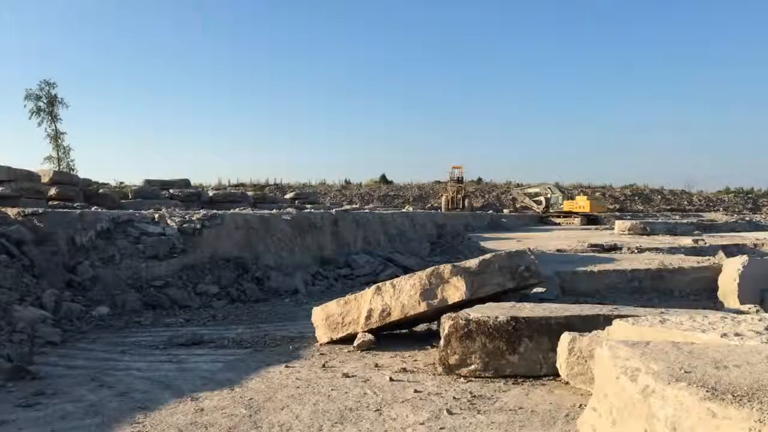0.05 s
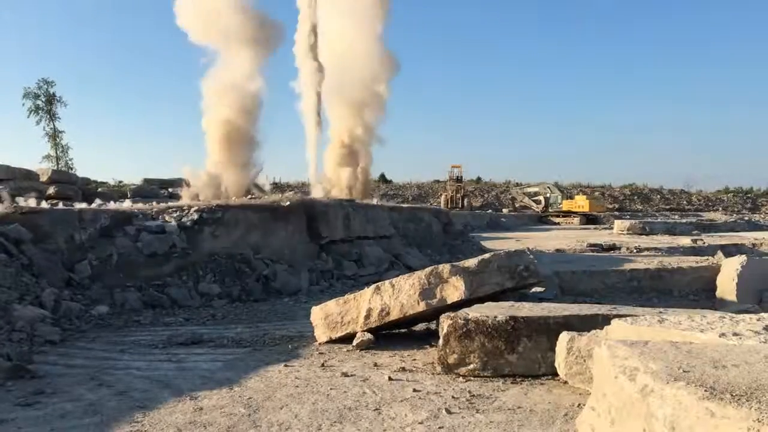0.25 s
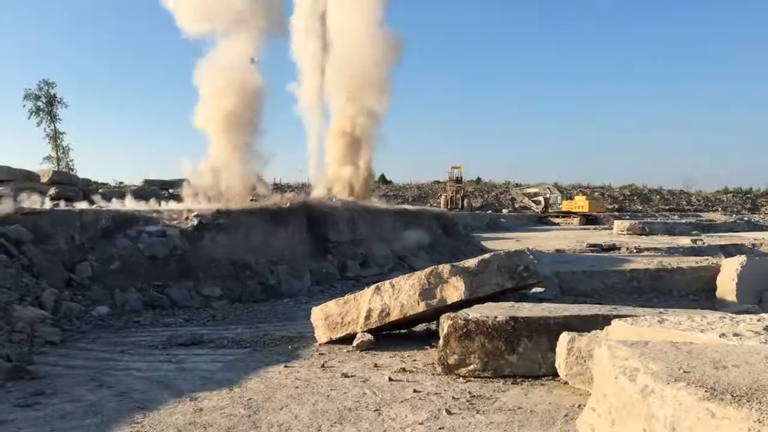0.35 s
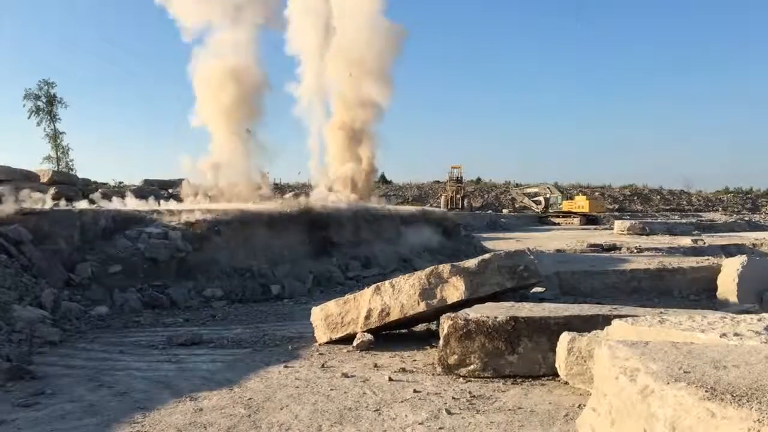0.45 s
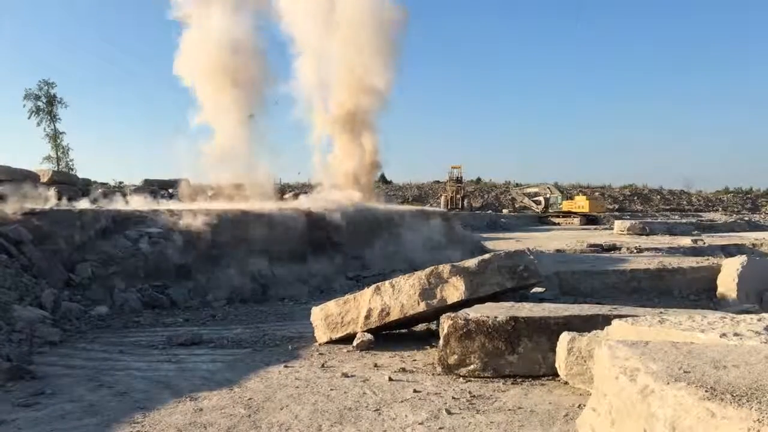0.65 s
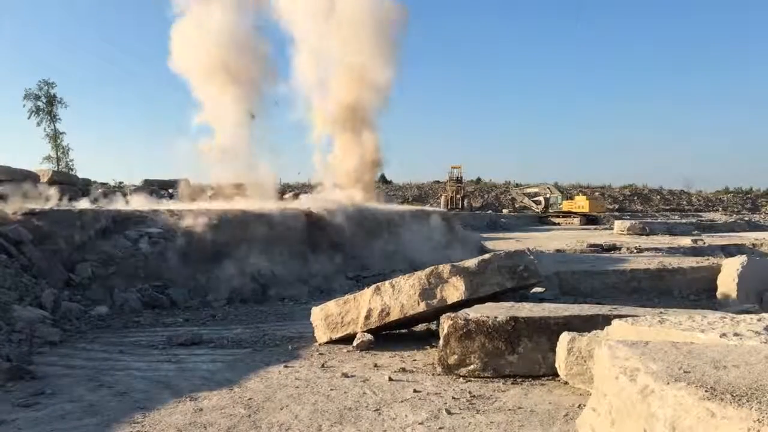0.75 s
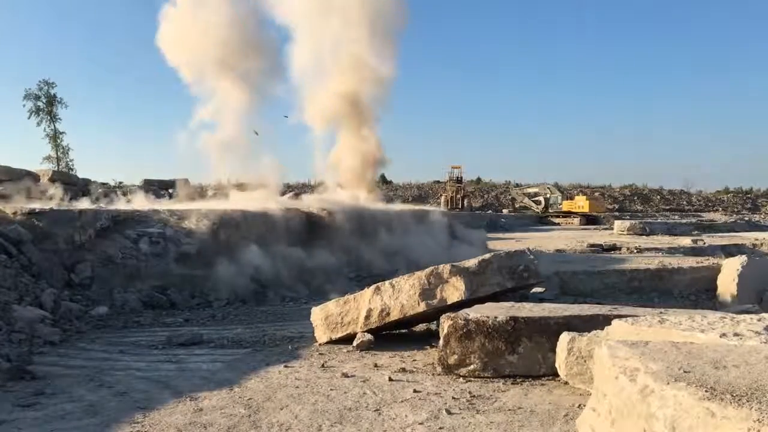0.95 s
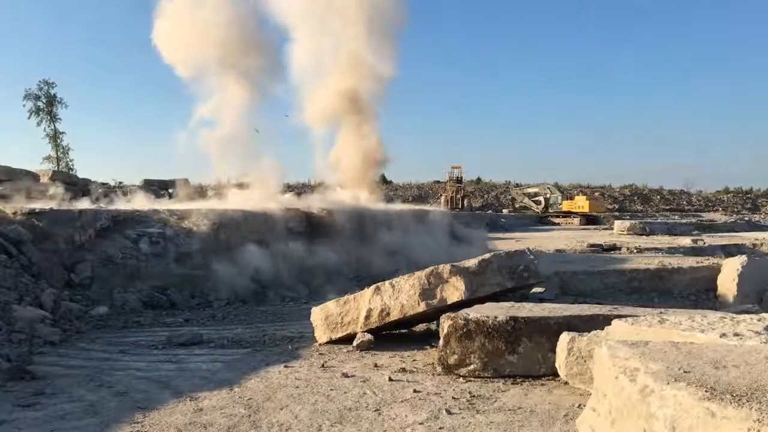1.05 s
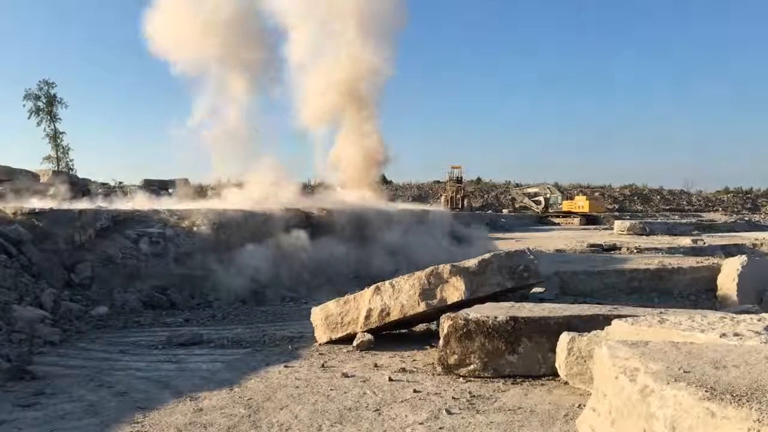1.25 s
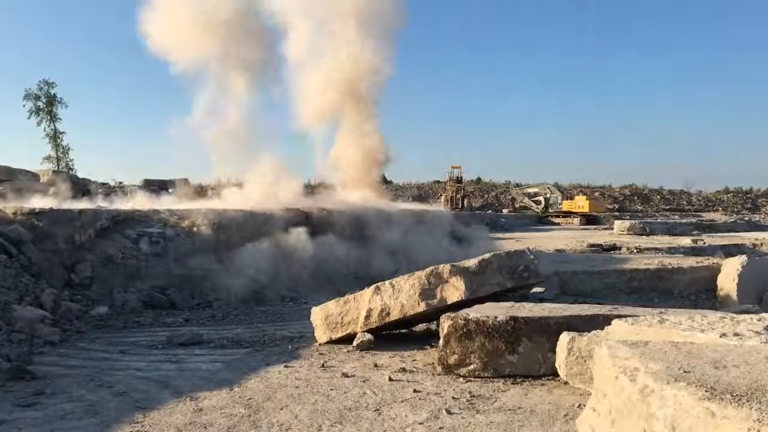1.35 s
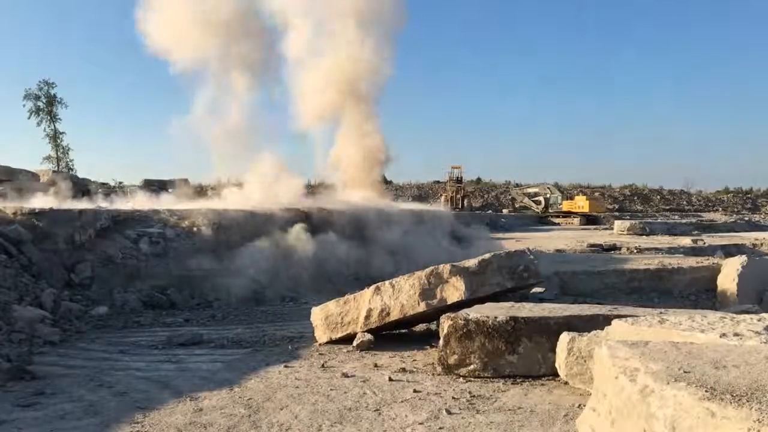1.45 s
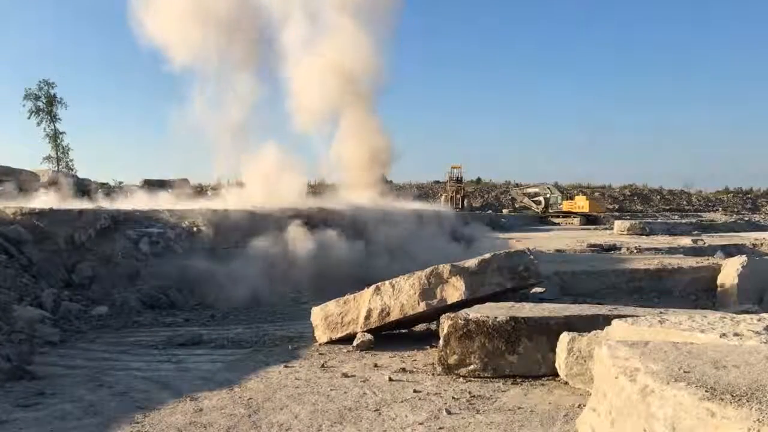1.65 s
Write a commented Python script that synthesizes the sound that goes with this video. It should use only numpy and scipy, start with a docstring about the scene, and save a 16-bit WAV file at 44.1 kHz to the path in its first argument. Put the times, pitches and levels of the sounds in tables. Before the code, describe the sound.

Explosion in a quarry: deep thump, tearing crack, rock-face slaps, then raining debris and a thud

```python
"""Quarry blast

Rock charges go off across a quarry, heard on a small camera. The ground shock comes first, as low swings that die
away; then the air blast, as shaped noise with short cracks and two slaps from the rock faces. Grit (noise and tiny
tones) and stones (short noise hits) rain down over a low rumble and far noise, and a big block lands with a thud.
The microphone rings near 3.4 kHz and flattens the loudest swings."""
import sys
import numpy as np
from scipy.fft import rfft, irfft, next_fast_len
from scipy.io import wavfile
from scipy.ndimage import map_coordinates

SR = 44100
rng = np.random.default_rng(int(sys.argv[2]) if len(sys.argv) > 2 else 0)


def waveform_to_disk(signal):
    """Save audio, clipped to [-1, 1], as 16-bit WAV at the path in sys.argv[1]."""
    frames = np.transpose(np.atleast_2d(signal))
    scaled = np.clip(frames, -1, 1) * 32767
    samples = np.round(scaled).astype(np.int16)
    wavfile.write(sys.argv[1], SR, samples)


N = 74970  # length in samples, 1.7 s

# Loudness of the low rumble. Each row: time in seconds, level in dB.
RUMBLE_LEVEL = [(0, -23.5), (.2, -32), (.34, -23), (.4, -29.5), (.47, -36), (.52, -27), (.6, -26),
                (.668, -22.5), (.69, -39.5), (.76, -31), (.85, -33), (.98, -32), (1.17, -23), (1.2, -50),
                (1.3, -26.5), (1.4, -33.5), (1.46, -24), (1.57, -25), (1.63, -25), (1.66, -30.5),
                (1.7, -17)]
# Colour of the rumble. Each row: frequency in Hz, strength in dB.
RUMBLE_COLOUR = [(20, -32), (40, -6), (62, -6), (90, -0.5), (125, -9), (160, -8.5), (200, -15.5),
                 (260, -17), (320, -29.5), (900, -43), (3000, -120)]

# Colour of the steady far noise. Each row: frequency in Hz, strength in dB.
FAR_NOISE_COLOUR = [(150, -22), (300, 0.5), (600, -9.5), (1500, -9.5), (3500, -12), (5000, -18.5),
                    (7000, -30.5), (9000, -53), (15500, -53)]
FAR_NOISE_DB = -51

# Low swings of ground and air. Each row: start in seconds, level in dB, pitch in Hz, time constant of the rise
# in seconds, basic time to fall by 60 dB in seconds (each tone of the swing takes its own share of it).
LOW_SWINGS = [(0.2371, -1.5, 153.2, 0.0066, 0.14), (0.246, -2.5, 99.4, 0.001, 0.093),
              (0.2534, 4.5, 76.6, 0.0018, 0.14), (.279, -2.5, 163.5, 0.0085, 0.19),
              (0.303, 2.5, 57.4, 0.0043, 0.126), (0.381, -0.5, 88, 0.005, 0.047),
              (0.586, -23, 103.7, 0.0038, 0.59), (0.641, -26.5, 100, 0.0059, 0.14),
              (1.211, -14.5, 83.06, 0.0033, 0.5), (1.23, -9, 133.5, 0.0028, 0.049),
              (1.241, -2, 108.2, 0.0026, 0.096), (1.477, -5, 119, .003, 0.03),
              (1.523, -18, 76, 0.0044, 0.21), (1.616, -23, 137.7, 0.0054, 0.2),
              (1.692, -19, 84, 0.0032, 0.17)]
# Overtones of every low swing. Each row: pitch as a multiple of the swing's, level in dB beside it,
# share of the swing's basic fall time.
SWING_OVERTONES = [(2.3, -6.5, 0.39), (3.7, -10, 0.23)]

# Loudness of the air blast. Each row: time in seconds, level of the dull roar in dB,
# level of the bright tearing in dB.
BLAST_LEVELS = [(0.229, -49.5, -66), (0.238, -31, -82), (0.254, -36.5, -74), (0.261, -7.5, -31.5),
                (0.289, -15, -31.5), (.296, -10, -22), (.3, -10.5, -28.5), (0.322, -22.5, -25),
                (0.346, -23.5, -32), (0.356, -21, -27), (0.377, -23.5, -31.5), (.39, -34, -40),
                (0.418, -29.5, -39), (.455, -45.5, -51), (.5, -93, -50)]
# Colours of the dull roar and the bright tearing. Each row: frequency in Hz, strength in dB.
ROAR_COLOUR = [(60, -28.5), (200, 5), (450, -8.5), (1100, -8.5), (2000, -20), (4000, -36), (8000, -82),
               (16000, -120)]
TEAR_COLOUR = [(500, -6), (1500, -11), (3000, -1.5), (6000, -7.5), (10000, -17), (15500, -32)]
# Cracks of the charges and slaps from the rock faces. Each row: start in seconds, level in dB, centre in Hz,
# width of the resonance as a share of its centre, time for the crunch to fall by 60 dB in seconds.
CRACK_HITS = [(.2595, -20, 586, 0.5, 0.01), (.272, -16, 2600, 0.83, 0.041), (.278, -11, 1075, 0.46, 0.019),
              (.2855, -11, 1510, 1.5, 0.044), (.2905, -10.5, 1890, 1.94, 0.065),
              (.351, -16, 3400, 1.64, .025), (.3515, -17.5, 906, 0.3, 0.033),
              (.3535, -19, 1520, 0.48, 0.018), (.4165, -30, 3500, 0.98, 0.024)]

# Loudness of the falling debris. Each row: time in seconds, level of the gravel rush in dB,
# level of the fine patter in dB.
GRIT_LEVELS = [(.44, -74, -78), (.478, -46, -47), (.506, -33.5, -37.5), (.535, -36.5, -43),
               (.57, -34.5, -39.5), (.61, -40.5, -45), (.66, -35, -38.5), (.76, -42.5, -43.5),
               (.85, -37, -43.5), (.98, -35.5, -39.5), (1.06, -36.5, -43), (1.09, -36, -44.5),
               (1.17, -36.5, -41), (1.215, -38.5, -51), (1.25, -39, -57), (1.29, -40.5, -48),
               (1.36, -40, -56), (1.41, -39, -46), (1.45, -38.5, -58), (1.53, -37.5, -43.5),
               (1.58, -44, -60), (1.66, -38.5, -56), (1.7, -36.5, -46)]
# Colour of the gravel rush. Each row: frequency in Hz, strength in dB.
GRAVEL_COLOUR = [(100, -20), (220, 2.5), (400, -1), (700, -6.5), (1200, -6.5), (2500, -11.5), (4000, -15.5),
                 (4700, -19), (6500, -23), (8000, -30), (11000, -33.5), (15500, -43.5)]
GRAINS_PER_S = 800
GRAIN_HZ, GRAIN_SPREAD = 3403, 0.27  # middle pitch in Hz, spread of the natural log of pitch
GRAIN_SIZE_DB = 2.5  # average random boost of a grain
GRAIN_CYCLES = 4  # cycles in which a grain decays to 1/e

# Stones landing. Each row: start in seconds, level in dB, centre in Hz, width of the resonance as a share
# of its centre, time for the crunch to fall by 60 dB in seconds.
STONE_HITS = [(.509, -31.5, 1600, 1.6, 0.14), (.556, -31.5, 2680, 0.77, 0.057),
              (.6715, -34, 1510, 0.1, 0.02), (.898, -35.5, 4280, 0.68, 0.025),
              (.985, -39.5, 6500, 0.52, 0.015), (.994, -31, 2670, 0.43, .03),
              (1.015, -34.5, 3100, 0.27, 0.049), (1.0345, -33, 3700, 0.37, 0.023),
              (1.085, -34, 3270, 0.62, 0.073), (1.086, -43.5, 5560, 0.075, .08),
              (1.135, -33.5, 2900, 1, 0.027), (1.1457, -26, 2500, 0.74, 0.055),
              (1.18, -38, 4170, 0.73, 0.082), (1.192, -37, 3250, 0.12, .04),
              (1.203, -38, 3250, 0.13, 0.013), (1.202, -44, 5520, 0.085, 0.083),
              (1.228, -50, 445, 0.82, .09), (1.2715, -30.5, 3350, 0.77, 0.031),
              (1.283, -34.5, 1180, 0.81, 0.036), (1.3134, -31, 740, 1.6, 0.03),
              (1.3318, -38.5, 990, 0.26, 0.022), (1.3937, -37.5, 1950, 0.57, 0.011),
              (1.4575, -31.5, 3220, 0.76, 0.012), (1.458, -29, 1320, 0.82, 0.029),
              (1.5074, -32.5, 3130, 0.33, 0.01), (1.5304, -35, 4800, 0.85, 0.027),
              (1.539, -31, 639, 0.36, 0.085), (1.5992, -37, 3600, 0.73, 0.024),
              (1.63, -41, 6500, 0.82, 0.039), (1.672, -34.5, 2500, 0.52, 0.027),
              (1.6785, -23.5, 2580, 0.53, 0.043), (1.685, -32, 2430, 0.43, 0.02)]
KICK = 1.7  # strength of the opening click of cracks and stones, before scaling by the width

# Resonances of the microphone. Each row: centre in Hz, width in Hz, lift in dB.
MIC_RESONANCES = [(3250, 150, 4), (3470, 150, 8), (5630, 300, 5)]
BASS_CUT_HZ, TREBLE_ROLL_HZ, TOP_HZ = 30.3, 9260, 15750
CEILING, KNEE = 1.0, 5.4  # largest swing, sharpness of the bend towards it


def amp(db):
    """Turn dB into a plain gain."""
    return 10 ** (np.asarray(db) / 20)


def unit(x):
    """Scale a sound to an average strength (rms) of 1."""
    return x / np.sqrt(np.mean(x ** 2) + 1e-20)


def level(times, db):
    """Gain for every sample, drawn in straight dB lines between the given times in seconds."""
    return amp(np.interp(np.arange(N) / SR, times, db))


def wobble(rate):
    """A smooth random curve through `rate` random points a second."""
    points = rng.standard_normal(int(N * rate / SR) + 4)
    return map_coordinates(points, [np.arange(N) * rate / SR])


def filtered(x, response):
    """Multiply each frequency in x by response(Hz), with spare silence so the ringing does not wrap round."""
    m = next_fast_len(len(x) + 8192)
    return irfft(rfft(x, m) * response(np.fft.rfftfreq(m, 1 / SR)), m)[:len(x)]


def rush(colour):
    """Noise of rms 1, its strength over frequency drawn through the colour's points."""
    points_hz, db = np.transpose(colour)

    def response(hz):
        return amp(np.interp(np.log(hz + 1), np.log(points_hz), db))

    return unit(filtered(rng.standard_normal(N), response))


def peak(hz, centre_hz, width_hz):
    """A resonance with gain 1 at its centre, which rings only after it is struck."""
    return 1j * hz * width_hz / (centre_hz ** 2 - hz ** 2 + 1j * hz * width_hz)


def add(out, start_s, sound):
    """Mix a sound into out from start_s, cutting what runs past the end."""
    start = round(start_s * SR)
    out[start:start + len(sound)] += sound[:N - start]


def bursts(rows):
    """Short hits: a kick and dying crunch, coloured by a resonance that rings when it is narrow."""
    out = np.zeros(N)
    t = np.arange(SR // 5) / SR
    for start_s, db, centre_hz, width, t60 in rows:
        width_hz = abs(width) * centre_hz

        def colour(hz):
            return peak(hz, centre_hz, width_hz) ** 2

        noise = rng.standard_normal(len(t))
        crunch = noise * amp(-60 * t / t60)
        # a one-sample click, made stronger for a narrow resonance
        kick = KICK * np.sqrt(SR / width_hz) * (t == 0)
        hit = filtered(crunch + kick, colour) / np.std(filtered(noise, colour))
        add(out, start_s, amp(db) * hit)
    return out


def rumble():
    """Shifting rock and distant machines make a low noise whose loudness is lumpy."""
    noise = rush(RUMBLE_COLOUR)
    lumpy = amp(1.16 * wobble(30.28))
    return level(*np.transpose(RUMBLE_LEVEL)) * unit(noise * lumpy)


def far_noise():
    """The far noise of the quarry is a steady, coloured hiss."""
    return amp(FAR_NOISE_DB) * rush(FAR_NOISE_COLOUR)


def thumps():
    """Each push sets off a low swing with quicker-dying overtones."""
    out = np.zeros(N)
    t = np.arange(SR // 2) / SR
    tones = [(1, 0, 0.93), *SWING_OVERTONES]  # the main tone comes first
    for start_s, db, pitch_hz, rise_s, t60 in LOW_SWINGS:
        swing = np.zeros(len(t))
        for ratio, tone_db, share in tones:
            fade = amp(tone_db - 60 * t / (t60 * share))
            swing += fade * np.sin(2 * np.pi * pitch_hz * ratio * t)
        rise = 1 - np.exp(-t / abs(rise_s))
        add(out, start_s, amp(db) * rise * swing)
    return out


def blast():
    """The ragged roar of the gases turns brighter as the shock arrives; the cracks sit on top."""
    times, dull_db, bright_db = np.transpose(BLAST_LEVELS)
    ragged = amp(2.0 * wobble(199.7))  # shared by roar and tearing
    roar = level(times, dull_db) * unit(rush(ROAR_COLOUR) * ragged)
    tearing = level(times, bright_db) * unit(rush(TEAR_COLOUR) * ragged)
    return roar + tearing + bursts(CRACK_HITS)


def patter():
    """Many small grains of random time, size and pitch each ring for a few cycles; rms 1 in all."""
    draw = rng.random((int(GRAINS_PER_S * N / SR), 2))
    place, chance = draw[:, :1], draw[:, 1:]
    hz = GRAIN_HZ * np.exp(GRAIN_SPREAD * rng.standard_normal((len(draw), 1)))
    hz = np.clip(hz, 300, 9000)
    t = np.arange(400) / SR
    size = amp(-GRAIN_SIZE_DB * np.log(chance + 1e-9))  # a few grains are far louder than most
    envelope = np.exp(-t * hz / GRAIN_CYCLES) * (1 - np.exp(-t * hz))
    grains = size * envelope * np.sin(2 * np.pi * hz * t)
    # add up all grains at the samples where they fall
    at = (place * N).astype(int) + np.arange(len(t))
    return unit(np.bincount(at.ravel(), grains.ravel(), minlength=N)[:N])


def grit():
    """Falling debris is an uneven rush of gravel noise together with a fine patter of grains."""
    times, gravel_db, fine_db = np.transpose(GRIT_LEVELS)
    fine = level(times, fine_db) * patter()
    noise = rush(GRAVEL_COLOUR)
    uneven = amp(2.4 * wobble(90))
    return level(times, gravel_db) * unit(noise * uneven) + fine


def stones():
    """Each landing stone is a click and a short crunch with its own resonance."""
    return bursts(STONE_HITS)


def scene():
    """All the sounds of the quarry added together, as one channel."""
    return (thumps() + blast() + rumble() + grit() + stones() + far_noise())[None]


def microphone(hz):
    """Resonances lift narrow bands, while the lowest bass and the treble fall away."""
    bass_cut = (1j * hz / (BASS_CUT_HZ + 1j * hz)) ** 2
    treble_roll = 1 / (1 + 1j * hz / TREBLE_ROLL_HZ) ** 2
    ringing = 1 + sum((amp(db) - 1) * peak(hz, centre, width) for centre, width, db in MIC_RESONANCES)
    return bass_cut * treble_roll * ringing


def record(dry):
    """The microphone colours the sound, a soft ceiling flattens loud swings, and the top is cut off."""
    heard = filtered(dry[0], microphone)
    flattened = heard / (1 + np.abs(heard / CEILING) ** KNEE) ** (1 / KNEE)
    return filtered(flattened, lambda hz: hz < TOP_HZ)[None]


dry = scene()
out = record(dry)
waveform_to_disk(out)
```